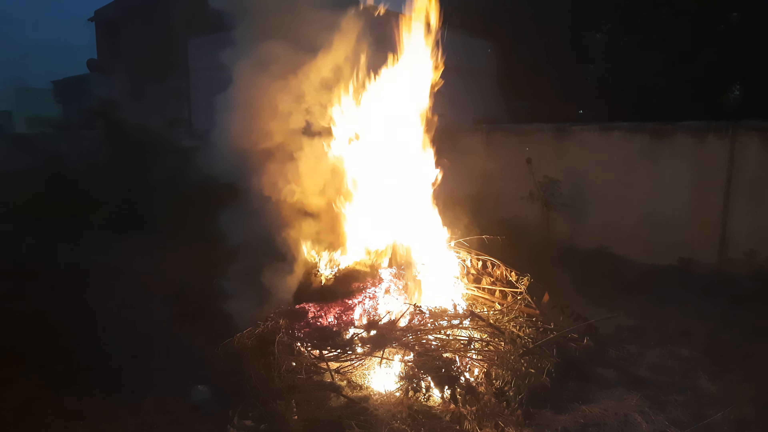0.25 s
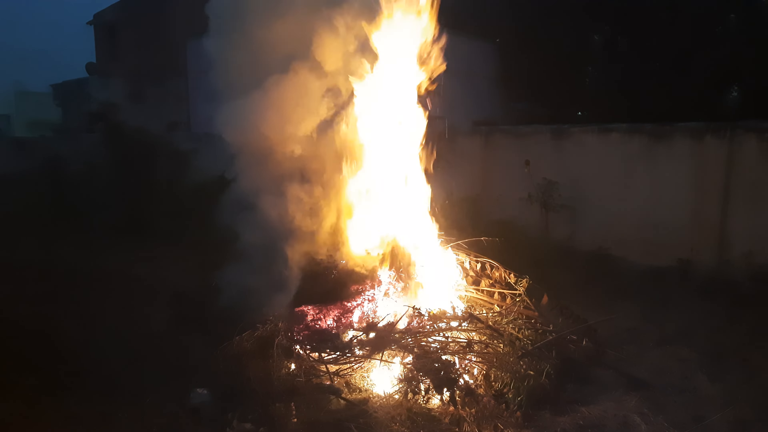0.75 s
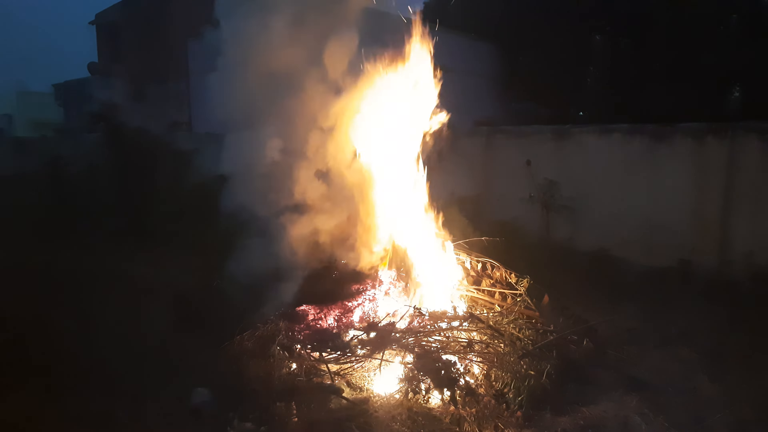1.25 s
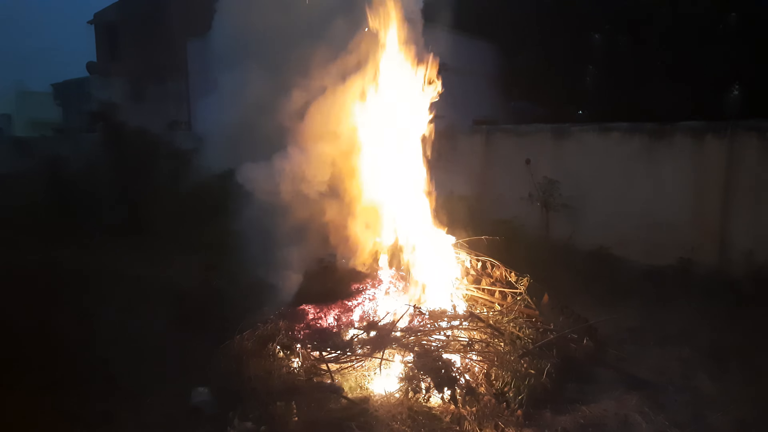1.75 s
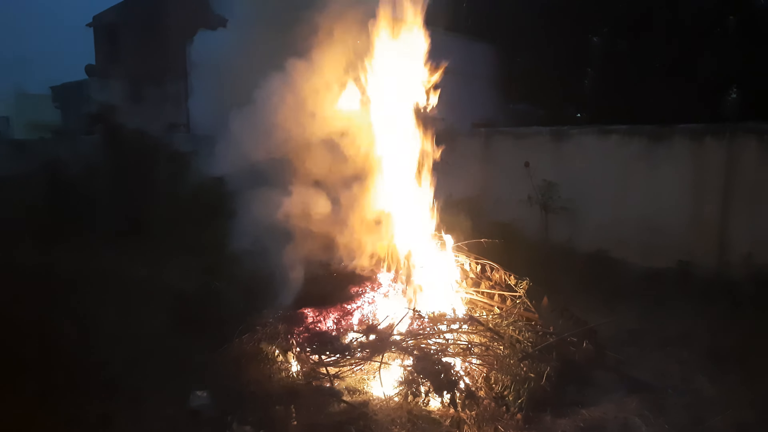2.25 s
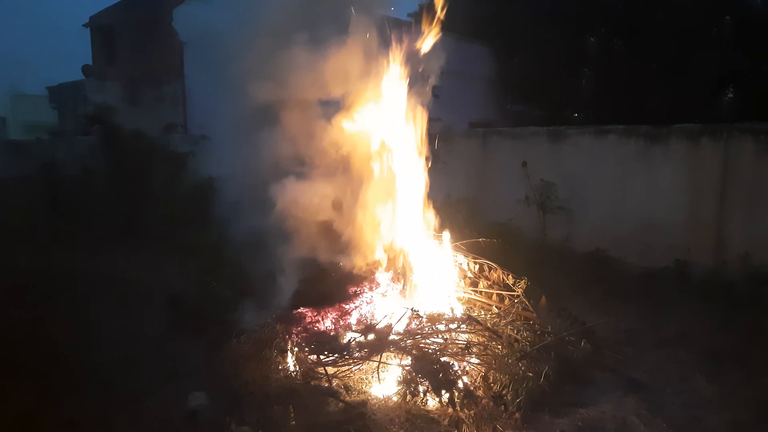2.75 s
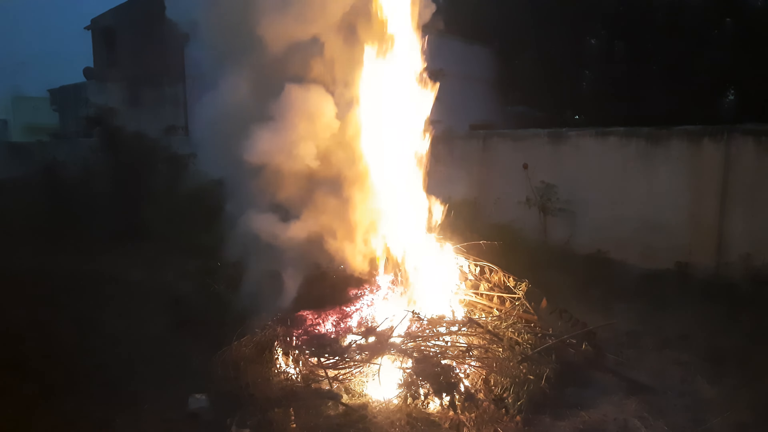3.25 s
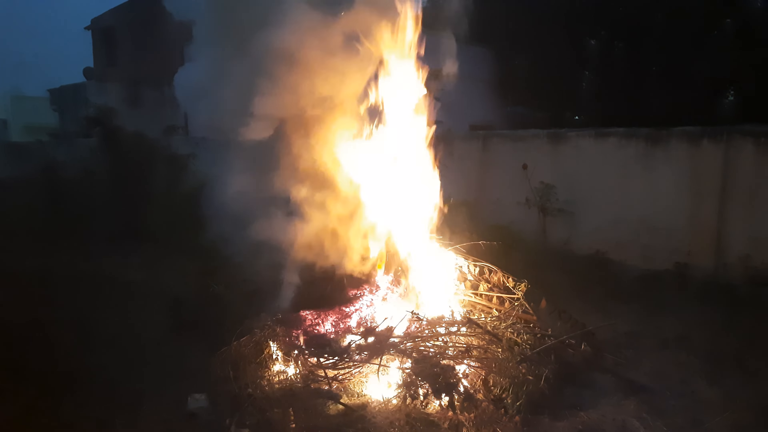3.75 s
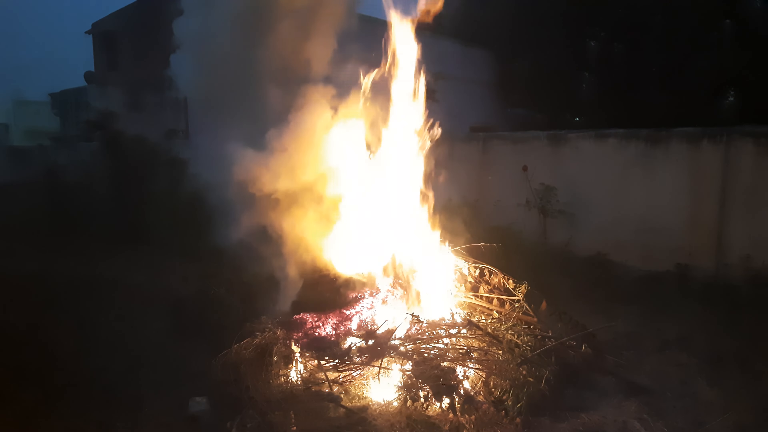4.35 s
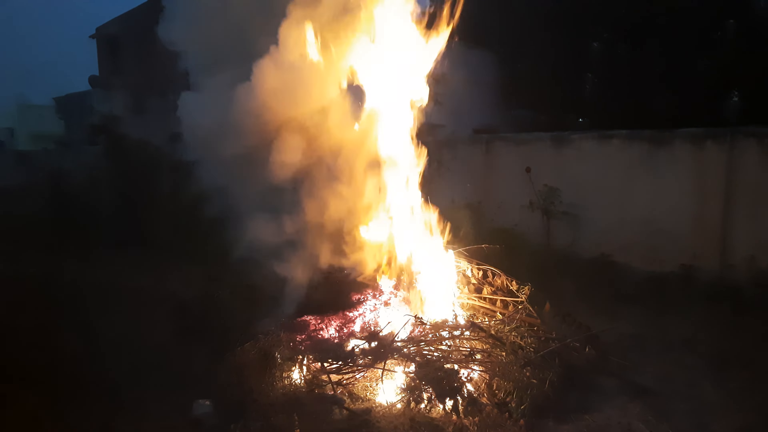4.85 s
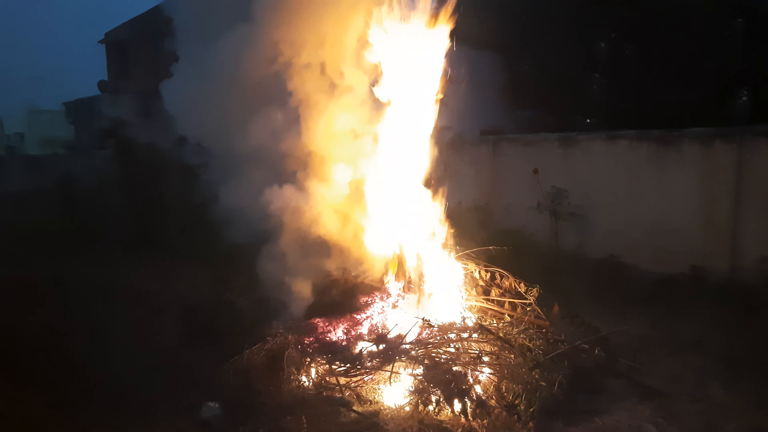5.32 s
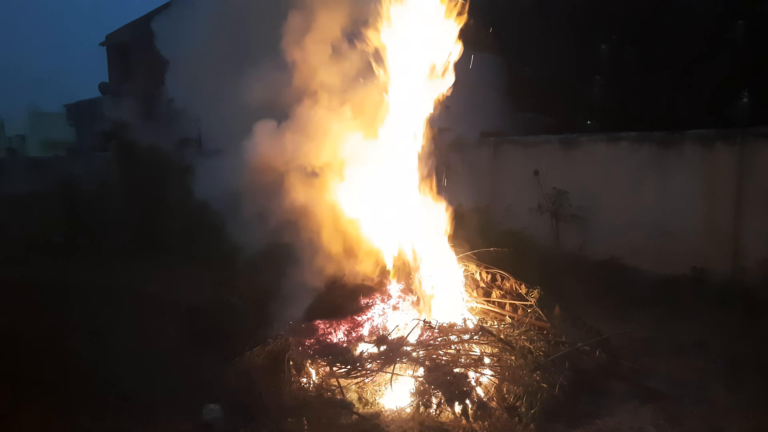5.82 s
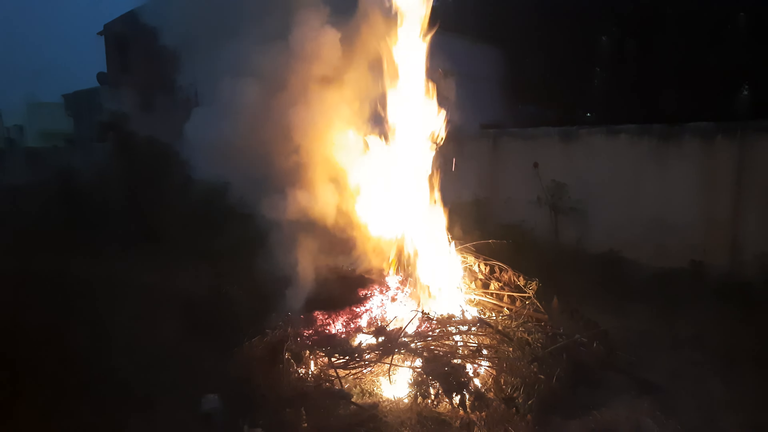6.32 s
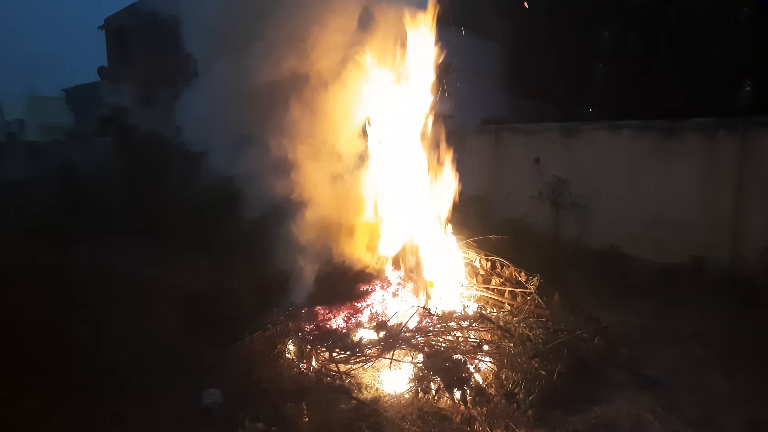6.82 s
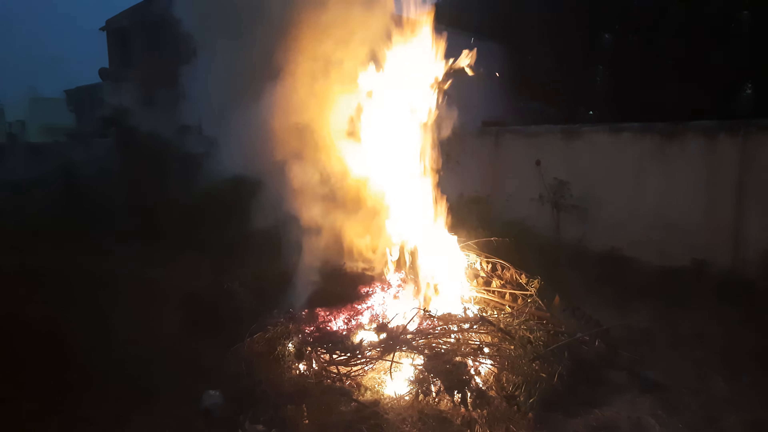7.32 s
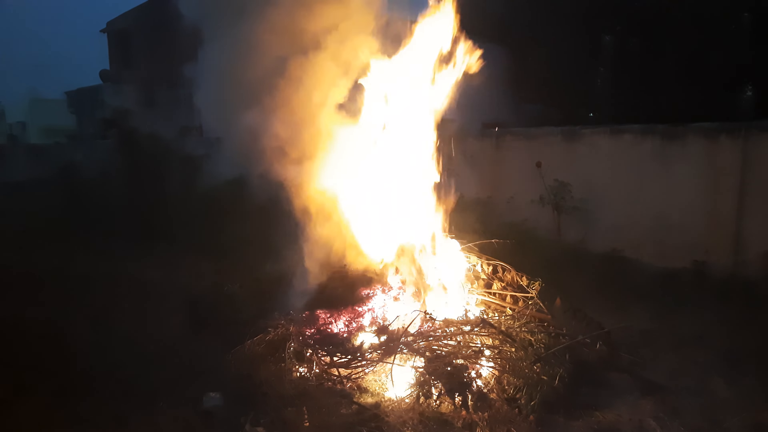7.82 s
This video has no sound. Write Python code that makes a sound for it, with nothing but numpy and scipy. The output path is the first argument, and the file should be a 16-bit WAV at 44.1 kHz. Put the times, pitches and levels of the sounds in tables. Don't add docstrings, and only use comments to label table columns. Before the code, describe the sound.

A heap of dry brush burns a few metres from a stereo microphone in a walled yard. Dense irregular ticks, twig snaps and hard, very short pops jump far above a quiet bed of fine crackle, gas hiss and low flame roar. Clusters alternate with brief thinner moments; faint wall echoes follow the loudest cracks.

```python
import sys
import numpy as np
from scipy import signal
from scipy.fft import rfft, irfft, next_fast_len
from scipy.io import wavfile
from scipy.ndimage import uniform_filter1d

SR = 44100
rng = np.random.default_rng(int(sys.argv[2]) if len(sys.argv) > 2 else 0)


def ratio_of_db(decibels):
    return 10 ** (np.asarray(decibels, float) / 20)


def master_out(mix):
    frames = np.transpose(np.atleast_2d(mix))
    ceiling = np.clip(frames, -1, 1)
    pcm = np.round(ceiling * 32767).astype(np.int16)
    wavfile.write(sys.argv[1], SR, pcm)


N = 355887

# (time [s], level [dB])
BLAZE = [(0.0, -46.5), (0.69, -54), (0.94, -48), (1.64, -53.5), (2.04, -48.5), (2.38, -51), (2.81, -46),
         (3.26, -55.5), (3.93, -54.5), (4.45, -47.5), (4.7, -47.5), (4.85, -53), (7.35, -51), (7.57, -44),
         (7.82, -54.5), (8.07, -54.5)]
# (frequency [Hz], level per Hz [dB])
HISS = [(290, -64.5), (500, -0.5), (570, -18.5), (834, 2), (1760, -1), (2100, 4), (3350, -2.5), (4690, 4.5),
        (7490, 3), (9740, -6), (12300, 1), (15850, -2), (16150, -52)]
BED_FOLLOWS = 0.31


def blaze_level():
    s, level_db = np.transpose(BLAZE)
    vigour_db = np.interp(np.arange(N) / SR, s, level_db)
    return vigour_db.mean(), vigour_db - vigour_db.mean()


def at_hz(points, hz):
    point_hz, value = np.array(points).T
    return np.interp(np.log(hz + 1), np.log(point_hz), value)


def rms_one(x):
    return x / np.sqrt(np.mean(x ** 2) + 1e-20)


def drift(rate):
    knots = rng.standard_normal(int(N / SR * 60) + 2)
    return np.interp(np.arange(N) / SR * rate, np.arange(len(knots)), knots)


def at_ports(pair, spectrum, even=0):
    # (frequency [Hz], left minus right [dB])
    balance = [(60, -1), (700, -.9), (1000, 3.5), (1600, 7.5), (2700, 2), (4500, -4.5), (9000, -6.5),
               (15000, -8)]
    # (frequency [Hz], likeness [0-1])
    likeness = [(60, .84), (350, .9), (800, .85), (1300, .4), (2700, .3), (5000, .1), (15000, 0)]
    length = pair.shape[-1]
    size = next_fast_len(length + 1448)
    half = size // 2
    hz = np.arange(half + 1) * SR / size
    alike = np.clip(at_hz(likeness, hz), 0, 1)
    one, other = rfft(pair[0], size), rfft(pair[1], size)
    out = []
    for sign in (1, -1):
        port = np.sqrt(1 + alike) * one + sign * np.sqrt(1 - alike) * other
        if even:
            port = port / np.sqrt(uniform_filter1d(np.abs(port) ** 2, size=even, axis=-1))
        colour_db = at_hz(spectrum, hz) + sign * at_hz(balance, hz) / 2
        cepstrum = irfft(np.log(ratio_of_db(colour_db)), size)
        cepstrum[1:half] *= 2
        cepstrum[half + 1:] = 0
        out.append(irfft(port * np.exp(rfft(cepstrum)), size)[..., :length])
    return np.array(out)


def flame(spectrum, flicker_db, rate):
    gas = ratio_of_db(flicker_db * drift(rate)) * rng.standard_normal((2, N))
    return rms_one(at_ports(gas, spectrum))


def gas_hiss(mean_db, swing_db):
    return ratio_of_db(mean_db + BED_FOLLOWS * swing_db - 4) * flame(HISS, flicker_db=1.5, rate=20)


def flame_roar(swing_db):
    # (frequency [Hz], level per Hz [dB])
    roar = [(15, -39), (30, -1), (63, -1.5), (128, 1.5), (184, -4), (303, -5.5), (424, -12.5), (545, -29.5),
            (700, -18), (910, -31), (1540, -120)]
    mean_db, follows = -54, .4
    return ratio_of_db(mean_db + follows * swing_db) * flame(roar, flicker_db=1.6, rate=28)


def crackle(mean_db, swing_db):
    per_s, spread_db, puff_s = 260, 5.0, .0009
    born = rng.random(N) < per_s * ratio_of_db(2.5 * drift(25)) / SR
    sizes = born * ratio_of_db(spread_db * np.minimum(rng.exponential(1, N), 3))
    puffs = signal.lfilter([1], [1, -np.exp(-1 / (puff_s * SR))], sizes + 1e-18)
    ticks = rms_one(at_ports(puffs * rng.standard_normal((2, N)), HISS))
    return ratio_of_db(mean_db + BED_FOLLOWS * swing_db - 1.1) * ticks


def strays(count, thin_body_db, thin_edge_db):
    level_db, spread_db, colour_scatter_db, follow = -48.5, 6, 5.5, .8
    s, vigour_db = np.transpose(BLAZE)
    t = np.linspace(0, N / SR - .02, 800)
    share = np.cumsum(ratio_of_db(follow * np.interp(t, s, vigour_db)))
    rows = []
    for size, body, edge in rng.standard_normal((count, 3)):
        at_s = np.interp(rng.random(), share / share[-1], t)
        rows.append((at_s, level_db + spread_db * size, thin_body_db + colour_scatter_db * body,
                     thin_edge_db + colour_scatter_db * edge))
    return rows


def wood():
    # (time [s], crack [dB], body [dB])
    ticks = [(0.032, -41, -24), (0.459, -40.5, -20), (0.8648, -37, -12), (1.0494, -45, -10.0),
             (1.3895, -39, -7), (1.5278, -30.5, -0.5), (1.9119, -43.5, -8.5), (2.035, -41, -14),
             (2.0685, -42, -1), (2.1109, -40, -3), (2.2171, -40.0, -12.0), (2.558, -40, -4),
             (2.9852, -35, -7), (3.1596, -35.0, -15.5), (3.489, -38.0, -10.5), (3.7059, -41, -8),
             (4.567, -46, -6), (4.5813, -34.5, -4), (5.5826, -40.5, -2), (5.7885, -41.5, -5.5),
             (5.9475, -35, -2), (6.0694, -40, -9), (6.436, -35.5, -10), (7.5452, -37.0, 0.5),
             (7.609, -37, -4.5), (7.622, -40, -14.5), (7.675, -32, -19), (7.694, -34, -5.5),
             (7.715, -34, -5), (7.7487, -37.5, -4.5)]
    # (time [s], crack [dB], body [dB])
    more_ticks = [(0.0557, -47, -13.0), (0.2407, -45, -6), (0.2503, -42, -19), (0.322, -44, -28),
                  (0.4473, -41.5, -15), (1.0992, -41, -6.5), (1.8218, -34.0, -9.0), (1.946, -43, -13.5),
                  (2.1426, -49, 3), (2.2758, -43.5, -3), (2.3583, -43.5, -4), (2.6717, -39, -8),
                  (2.839, -46, -3), (2.853, -42, -6), (2.9238, -39, -21), (2.9489, -43, -25), (3.073, -44, -12),
                  (3.1505, -41, -9), (3.1808, -41.0, -7), (3.3991, -46, -3), (3.789, -47, -12),
                  (3.7967, -44, -1), (5.1558, -41.5, -6), (5.8646, -41, -5), (6.1374, -37, -7.5),
                  (6.4117, -37.0, -1.5), (6.5006, -42.5, 3), (7.5204, -37.5, -21), (7.6696, -43, -4),
                  (7.772, -43, -16)]
    # (time [s], crack [dB], body [dB], edge [dB])
    pops_and_snaps = [(0.0803, -29, -13, -2), (0.1053, -27.5, -12.5, -3.5), (0.1838, -19.5, -12.5, -11.5),
                      (0.7934, -24.5, -13, -0.5), (0.952, -29, -9, -18), (1.0393, -25.5, -10, -8.5),
                      (1.5024, -19.5, -11.5, -9), (1.769, -28.5, -6.5, -3), (1.8406, -19.5, -10.5, -6),
                      (2.1534, -24.5, -11.5, -2.5), (2.5413, -23.0, -11.5, -8), (2.5696, -21.5, -4, -6.0),
                      (2.6491, -18.5, -4.0, -11), (2.9902, -21, -10.5, 1.5), (4.5044, -28.5, -7.5, -10.0),
                      (4.5558, -17.5, -9.5, -7), (4.7841, -19, -12.5, -1.5), (4.8557, -26.5, -11, -2),
                      (5.0274, -24, -8, -5.5), (5.2945, -29, -9, -4.5), (5.3329, -24.0, -11, -4.5),
                      (5.9225, -21.5, -10, -8.5), (6.0821, -29, -13, 5), (6.3835, -17, -8.5, -1.5),
                      (6.7876, -29.5, -1, -6), (7.3762, -25.5, -8.5, -5), (7.4949, -25.5, -9.5, -6.5),
                      (7.5836, -21.5, -10.5, -2.5), (7.6507, -28.5, -16, -5), (8.0553, -28.5, -6, -11.0),
                      (0.4008, -35.5, -14, -0.5), (0.8213, -33.5, -7, -8), (1.1591, -33, -15, -4),
             (1.1639, -33.5, -9.5, -11.5), (1.3265, -39.5, -13.5, 2.5), (1.3649, -29.5, -5.5, -14),
             (2.3213, -34.5, -10, -8), (2.7774, -33, -9, -6), (2.8121, -31, -7, -12.5),
             (3.13, -38, -10, 0.5), (3.6711, -32.5, -11.5, -2), (4.0423, -35, -12.5, -12),
             (4.1094, -36, -11, 0.0), (4.1481, -33, -6.5, -7), (4.301, -32.5, -13, 1.5),
             (4.4506, -37.5, 1.5, -9.0), (4.481, -33, -2, -19), (4.5291, -32, -11, -12),
             (4.7469, -32, -9.5, -10), (5.5043, -42, -12, 7.5), (5.5277, -34.5, -14, -3),
             (5.648, -27, -2.5, -13), (6.1655, -33.5, -4.5, -10.5), (6.5798, -35, -3.5, 0),
             (6.8476, -36.5, -22, -11.0), (6.987, -38.0, -11.5, -1), (7.1683, -35.5, -12.5, -8),
             (7.278, -33.5, -9.5, -9.5), (7.4009, -31, -5, -11.0), (7.6898, -33, -15, -6)]
    # (time [s], body at 1.6-3.5 kHz [dB], knock and crack against it [dB])
    knocks = [(0.1319, -39.5, -2.5, -0.5), (0.1608, -44.0, -3, -3), (0.977, -45.0, 1, -15),
              (1.8666, -51, 9, -8), (1.98, -28, -9, -6.5), (2.4432, -39, -13, -0.5),
              (2.579, -43, -13.0, -11), (2.6597, -41, -15, -0.5), (2.8637, -32.5, -8, -3),
              (2.9034, -31, -12, -0.5), (3.0275, -33, 6, -21), (3.6263, -42.5, 0.5, 1),
              (3.654, -50.5, 6.5, 5.5), (4.0917, -38, -4, -3), (4.174, -37, -6.5, -13),
              (4.2916, -37.5, -4, -2), (4.3193, -40.5, -1, -4), (4.3549, -32.5, -7.5, 3),
              (4.3793, -34, -13, -9), (4.6207, -23, -4, -1), (5.2808, -30.5, -3, -1.5),
              (5.3208, -41, -6.0, 1.5), (5.933, -42, -21.0, -14), (6.3279, -31, -10, -4.5),
              (6.7059, -42.5, -2, -8), (6.9257, -38.5, -4.5, -1), (7.0492, -32.5, -7.5, -5.5),
              (7.2373, -32, -5.5, -2), (7.4518, -29.5, 2.5, -5), (7.7413, -41.5, -2, -11)]
    # (time [s], crack [dB], edge [dB])
    spits = [(0.1433, -40, 2), (0.193, -53, 10), (0.359, -39, 2), (0.3692, -43, 2), (0.3742, -48, 9),
             (0.3792, -39, -6), (0.587, -37.5, -3), (0.6583, -50, 9), (1.0825, -37.5, -1),
             (1.1185, -39, -4), (1.1337, -40, 3), (1.2373, -61, 14), (1.3534, -38.5, -0.5), (2.241, -49, 3),
             (2.4196, -35.5, 0.5), (2.5133, -53, 14), (2.705, -37, -0.5), (2.943, -53, 14),
             (3.3739, -38.0, -2), (3.6887, -37.5, 1.5), (4.2644, -56, 11), (4.4144, -41.0, 0.5),
             (4.7533, -40.5, 2), (5.1313, -41, -2.5), (5.829, -47, -3), (5.9613, -38, -1),
             (6.1065, -41.0, 0.0), (6.2833, -50, 8), (6.8841, -44, 0), (7.8978, -43, 4)]
    thin_body_db, thin_edge_db, thick_edge_db = -10.5, -4.5, -9.5
    knock_under_body_db = 3
    thin = pops_and_snaps
    thin += [(s, crack, body, thin_edge_db) for s, crack, body in ticks + more_ticks]
    thin += [(s, crack, thin_body_db, edge) for s, crack, edge in spits]
    thin += strays(95, thin_body_db, thin_edge_db)
    rows = [(s, crack, body - knock_under_body_db, body, edge) for s, crack, body, edge in thin]
    for s, body_db, knock, crack in knocks:
        rows.append((s, body_db + crack, knock - crack, -crack, thick_edge_db))
    return np.array(rows), np.arange(len(rows)) >= len(thin)


def bursts(count):
    # (frequency [Hz], level per Hz [dB])
    pop_colour = [(120, -23), (200, -5.5), (279, -3.5), (542, -11.5), (876, -1), (1800, 1), (2160, 7.5),
                  (2650, 5), (3370, -0.5), (4790, 11), (7600, 8), (10000, -11.5), (12500, -2.5),
                  (15300, -12), (16500, -37.5)]
    t = np.arange(-40, 560) / SR
    draw = rng.standard_normal((count, 4, len(t)))
    tear_s = .0013 * np.exp(.25 * draw[:, 3, :1])
    spike, tear, tail = np.exp(-t / .0003), np.exp(-t / tear_s), np.exp(-t / .005)
    shape = spike + .65 * tear + .045 * tail
    crack = draw[:, :2].swapaxes(0, 1) * shape * (t >= 0) * ratio_of_db(3.06 * draw[:, 2])
    bounce = signal.sosfilt(signal.butter(1, 3000, fs=SR, output="sos"), crack)
    lag = round(.0009 * SR)
    crack[..., lag:] += ratio_of_db(-5) * bounce[..., :-lag]
    return at_ports(crack, pop_colour, even=40)


def pops():
    split_hz = (150, 700, 1600, 3500, 9000, 16000)
    thump_under_knock_db, height_db = 7, 1.34
    thick_thump_db = 0.5
    rows, thick = wood()
    s, crack_db, knock_db, body_db, edge_db = rows.T
    burst = bursts(count=len(s))
    thump_db = knock_db - thump_under_knock_db + thick_thump_db * thick
    levels = (thump_db, knock_db, body_db, 0, edge_db)
    sound = 0
    for low, high, level_db in zip(split_hz, split_hz[1:], levels):
        band = signal.butter(3, [low, high], "band", fs=SR, output="sos")
        part = signal.sosfilt(band, burst)
        height = np.sqrt(uniform_filter1d(part.mean(axis=0) ** 2, size=88).max(axis=1))
        sound = sound + part * (ratio_of_db(height_db + crack_db + level_db) / height)[:, None]
    out = np.zeros((3, 2, N + 600))
    spot = np.arange(len(s))[:, None] % 3
    at = np.round((s - .0016) * SR).astype(int)[:, None] + np.arange(600)
    for port in range(2):
        np.add.at(out[:, port], (spot, at), sound[port])
    return out[..., :N]


def yard(x):
    # (delay [s], level [dB], smear [s])
    walls = [
        (0.0123, -17, 0.0008),
        (0.0155, -50, 0.0023),
        (0.024, -19, 0.0016),
    ]
    tail_db, t60, grain_db, dull_hz = -24.5, 0.26, 5.0, 11700
    wash_rise_s = .009
    t = np.arange(int(.4 * SR)) / SR
    grain = ratio_of_db(grain_db * rms_one(uniform_filter1d(rng.standard_normal((3, 1, len(t))), size=60)))
    shape = ratio_of_db(tail_db - 60 * t / t60) * np.clip(t / wash_rise_s - .3, 0, 1) * grain
    for delay, level_db, smear in walls:
        shape = shape + ratio_of_db(level_db) * (t > delay) * np.exp(-np.abs(t - delay) / smear)
    answer = shape * rng.standard_normal((3, 2, len(t))) / 10
    wet = signal.fftconvolve(x, answer, axes=2)[..., :N].sum(axis=0)
    dull = signal.butter(2, [950, dull_hz], "band", fs=SR, output="sos")
    return 0.022 * wet + signal.sosfilt(dull, wet)


def scene():
    mean_db, swing_db = blaze_level()
    bed = gas_hiss(mean_db, swing_db) + flame_roar(swing_db) + crackle(mean_db, swing_db)
    spots = pops()
    return bed + spots.sum(axis=0) + yard(spots)


def band_limit(x):
    return signal.sosfilt(signal.butter(12, 17010, fs=SR, output="sos"), x)


def record(dry):
    no_rumble = signal.sosfilt(signal.butter(3, 48, "high", fs=SR, output="sos"), dry)
    limited = np.clip(no_rumble, -.8, .8)
    mix = signal.sosfilt(signal.cheby2(14, 70, 17200, fs=SR, output="sos"), limited)
    return band_limit(mix)


dry = scene()
out = record(dry)
master_out(out)
```